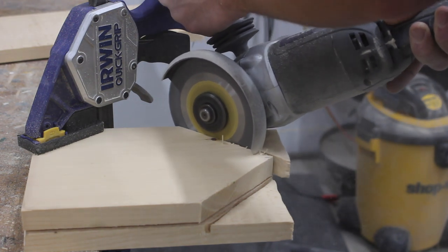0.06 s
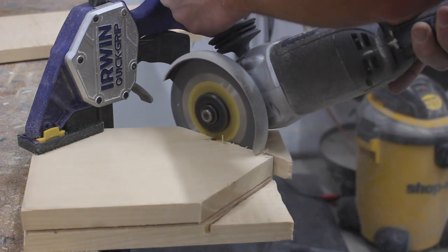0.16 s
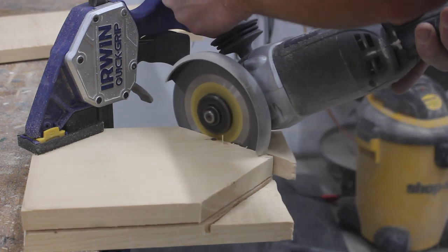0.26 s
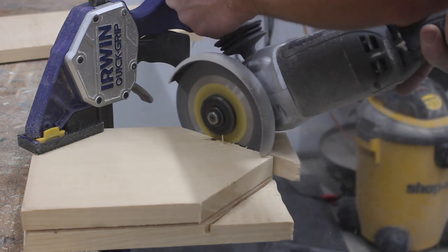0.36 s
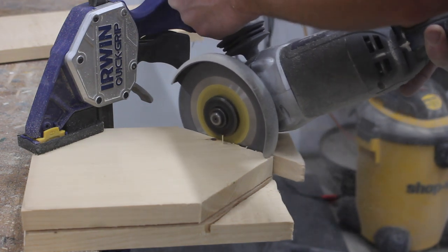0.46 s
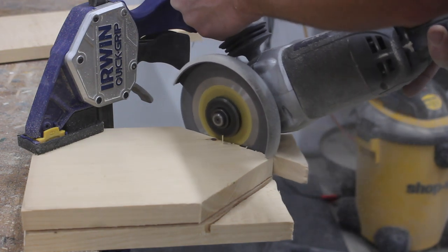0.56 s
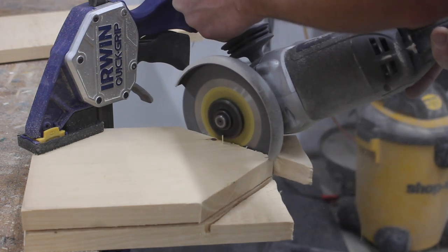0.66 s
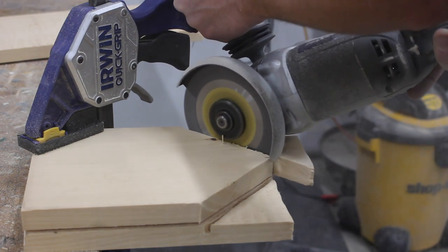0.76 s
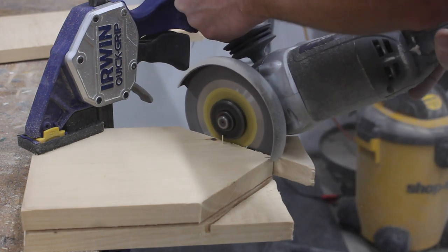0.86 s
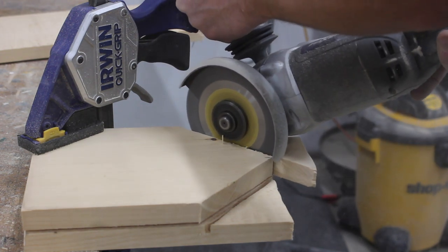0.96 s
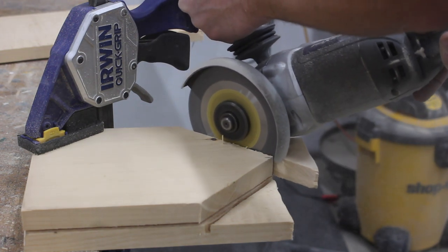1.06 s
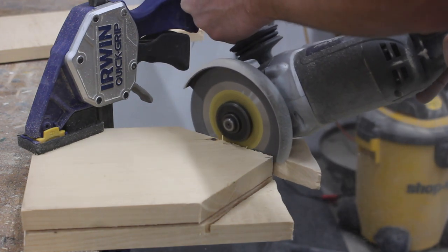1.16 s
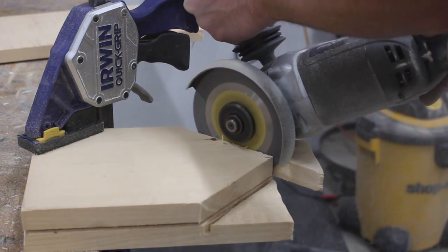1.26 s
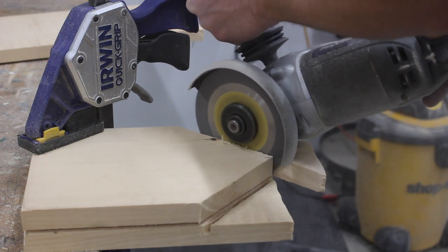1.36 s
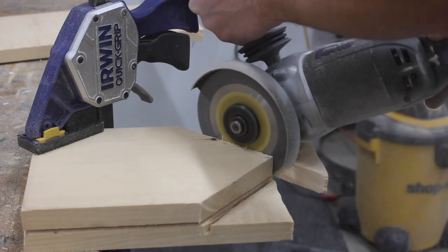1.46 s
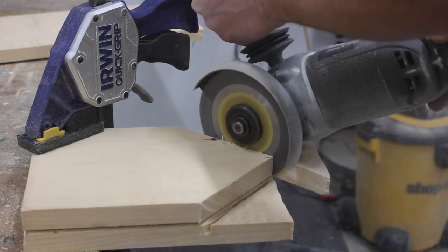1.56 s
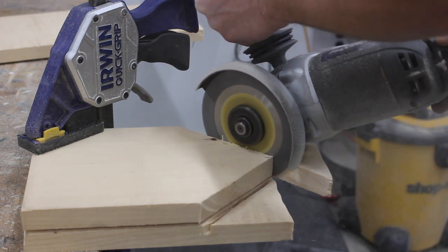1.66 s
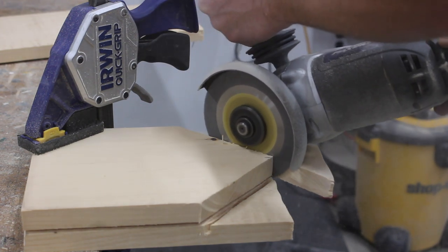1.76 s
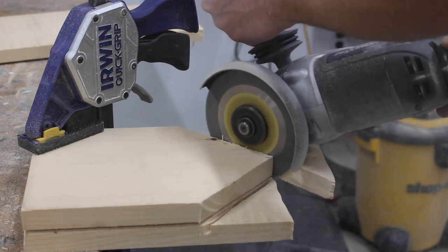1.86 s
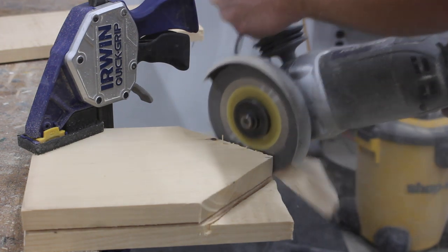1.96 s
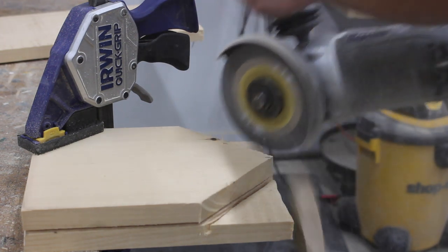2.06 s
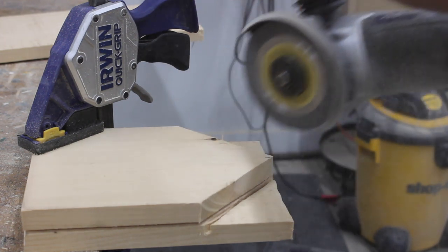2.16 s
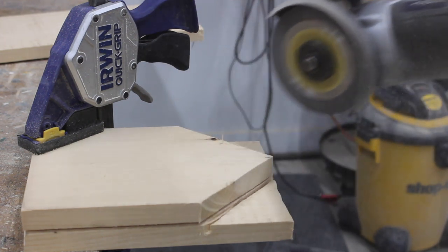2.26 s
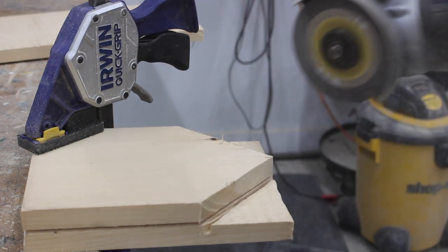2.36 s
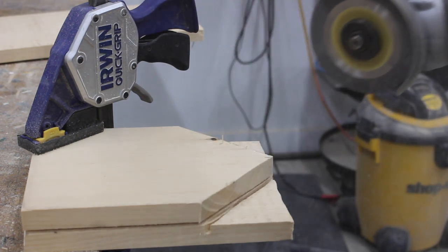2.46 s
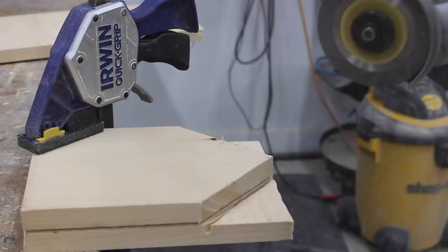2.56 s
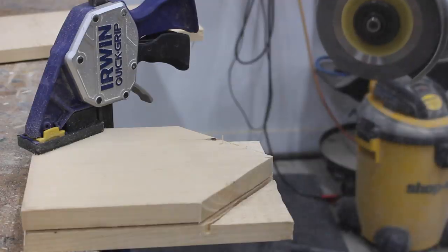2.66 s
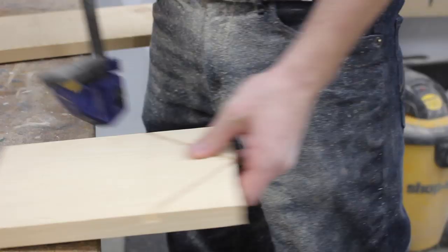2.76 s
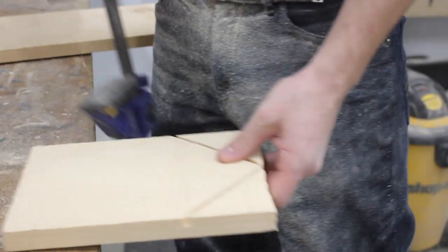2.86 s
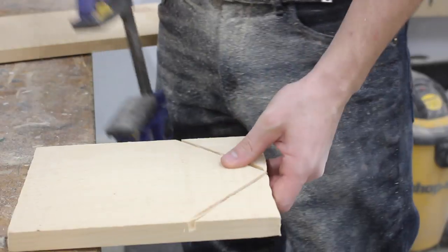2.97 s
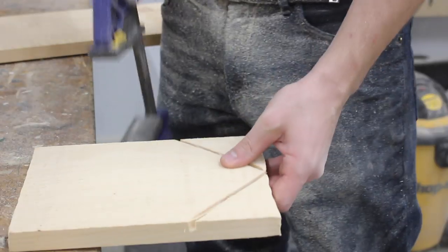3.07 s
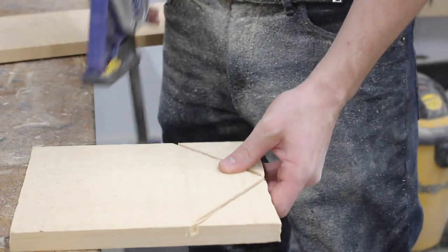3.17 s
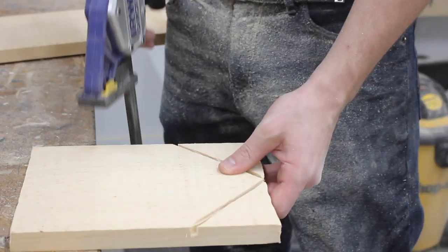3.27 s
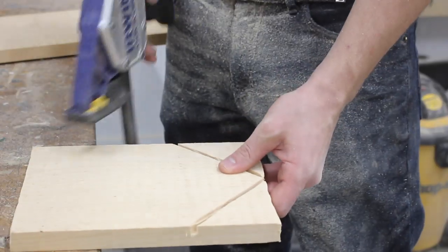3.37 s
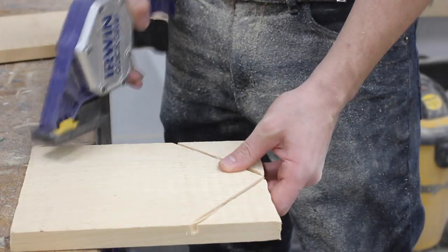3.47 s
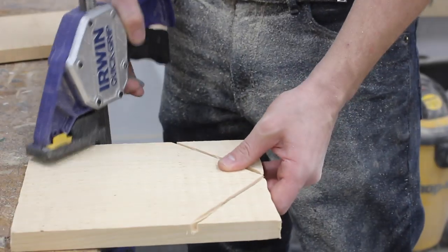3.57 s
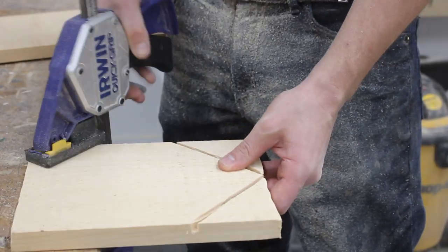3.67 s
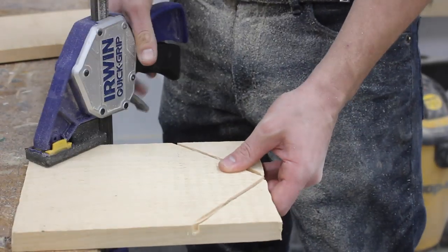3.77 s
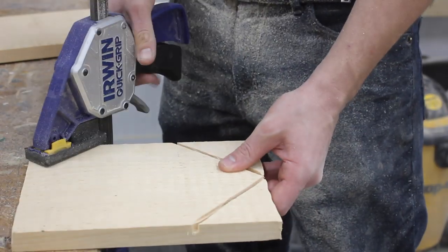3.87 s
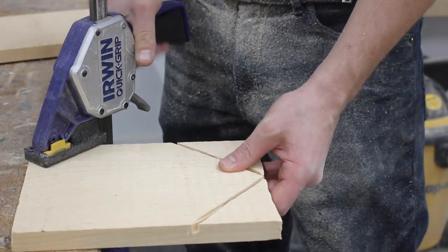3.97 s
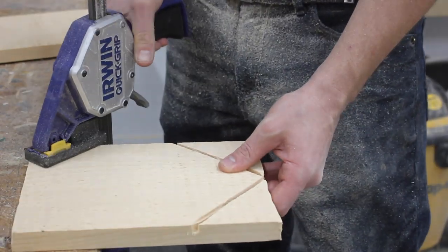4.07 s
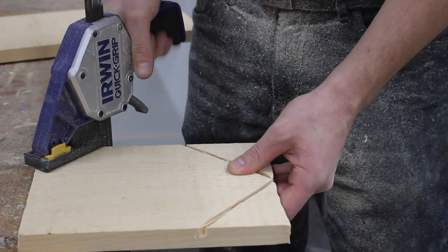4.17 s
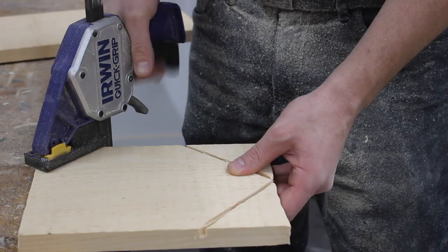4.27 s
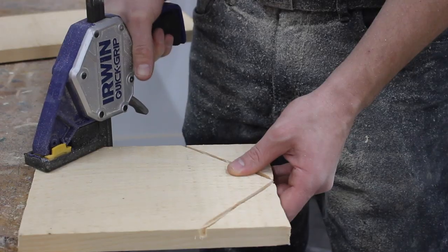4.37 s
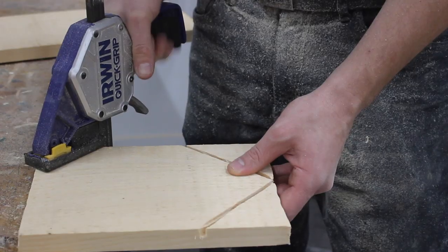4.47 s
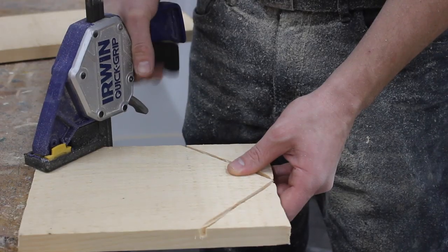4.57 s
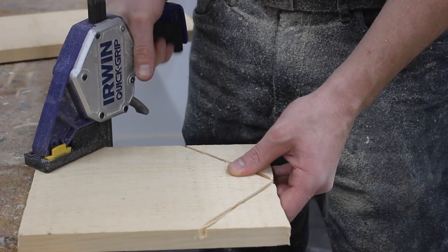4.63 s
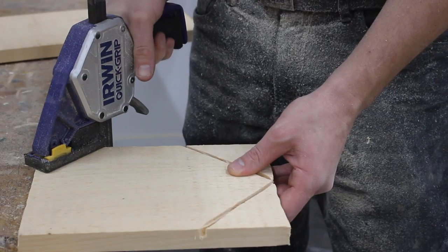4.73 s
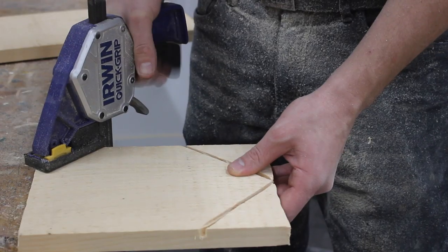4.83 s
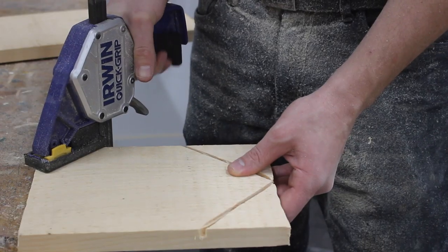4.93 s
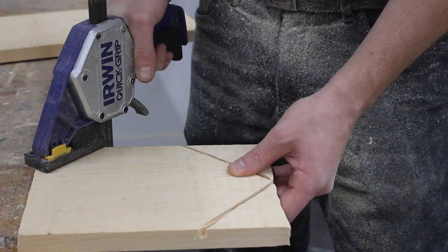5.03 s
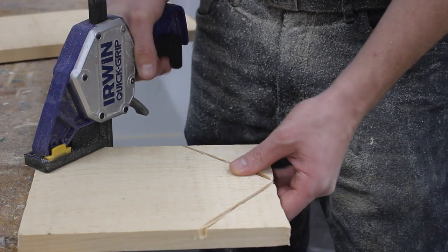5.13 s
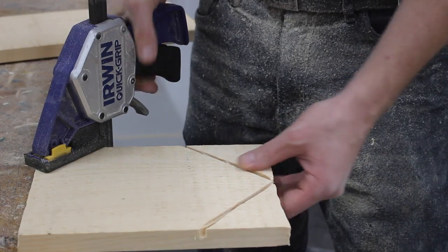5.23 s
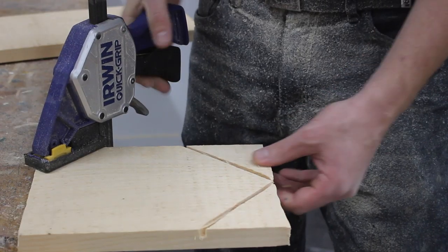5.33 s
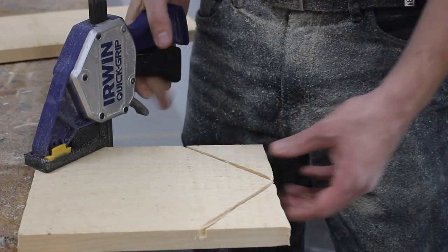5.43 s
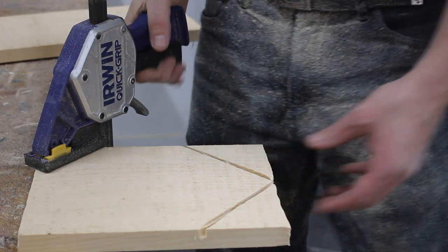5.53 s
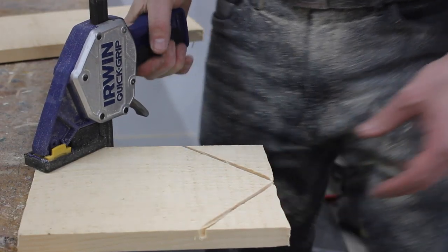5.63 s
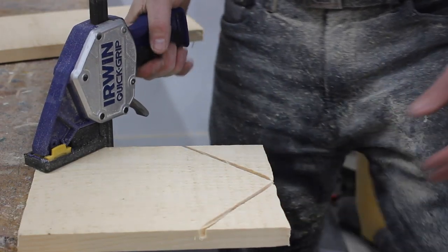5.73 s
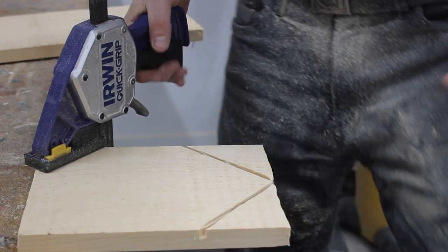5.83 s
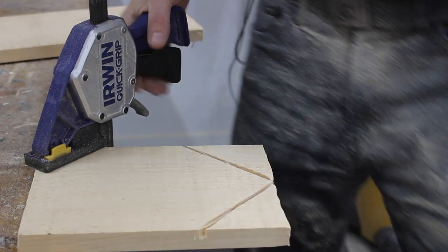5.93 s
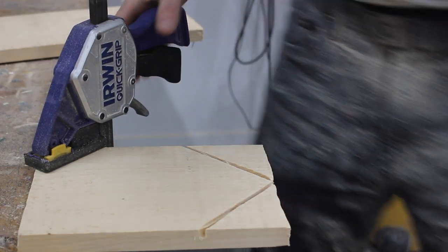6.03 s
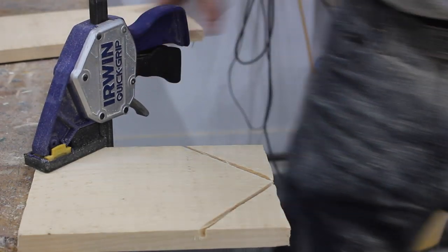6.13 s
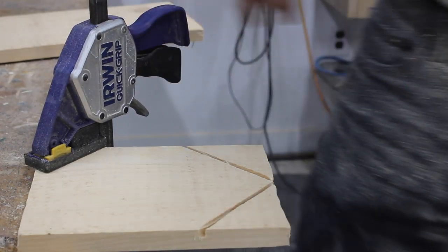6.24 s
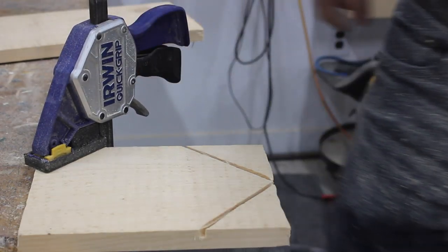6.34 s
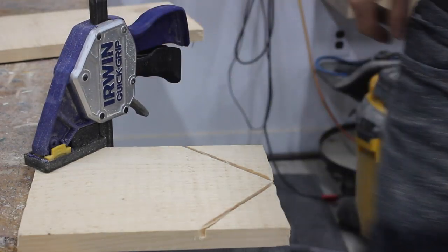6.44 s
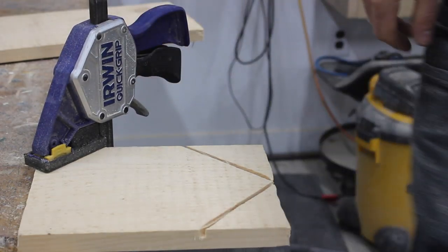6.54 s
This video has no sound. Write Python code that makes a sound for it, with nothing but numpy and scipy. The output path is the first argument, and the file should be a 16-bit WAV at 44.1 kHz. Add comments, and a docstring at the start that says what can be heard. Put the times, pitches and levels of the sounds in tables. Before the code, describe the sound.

From the start, an angle grinder cuts through a wooden board, loud, close and dry, with a high whine and a harsh rasp. Its pitch sags slightly as it bites deeper, with brief squeals. At about 2 seconds the blade comes free and coasts, falling in pitch with rushing air and rattling gears, then cuts off abruptly at 2.8 seconds. After a lull with light taps, a bar clamp lands on the board at 3.6 seconds with a sharp woody knock and a short judder. From 3.9 to 6 seconds it is pumped tight: uneven ratchet snaps, small scrapes and dull bench thumps, strongest around 4.4 and 4.7 seconds. The handle clacks against the metal bar at 5 and 5.6 seconds. Each hit rings briefly in a small workshop. Denim rustles over low shuffling, swelling after a last snap at 6 seconds, as a faint low hum sets in.

```python
"""An angle grinder whines and rasps through a board, comes free and starts to coast; its sound breaks off.
The whine is motor, gears and blade locked to the spindle speed; the rasp is the blade tearing wood fibres.
Then a one-handed bar clamp is set on the board and pumped tight: knocks, ratchet snaps and slides of the
bar thump the bench and ring in a small workshop. Clothes rustle, a faint hum sets in near the end, and a
limiter ducks after each loud blow."""
import sys
import numpy as np
from scipy import signal
from scipy.fft import rfft, irfft
from scipy.io import wavfile
from scipy.ndimage import uniform_filter1d, minimum_filter1d

SR = 44100
rng = np.random.default_rng(int(sys.argv[2]) if len(sys.argv) > 2 else 0)


def output_pcm(signal):
    """Save a mono or channel-first signal as 16-bit PCM at the path in sys.argv[1].

    Samples are clipped to [-1, 1] before scaling.
    """
    pcm = np.clip(np.atleast_2d(signal).T, -1, 1) * 32767
    wavfile.write(sys.argv[1], SR, np.round(pcm).astype(np.int16))


N = 291060
TIME = np.arange(N) / SR

IDLE_TURNS_PER_S, SAG_TURNS_PER_S = 173.6, 5.2   # spindle speed, and its drop under full load
# Grinder cues: the wood thins, the blade breaks through, power goes off, it comes free, the sound ends.
THINNING_S, THROUGH_S, SWITCH_OFF_S, FREE_S, END_S = 1.43, 1.95, 2.03, 2.11, 2.847

# The wood's drag on the blade. Each row: time in seconds, load from 0 to 1.
BLADE_LOAD = [(.28, 0), (.45, .27), (.62, .45), (.85, .96), (1.82, 1), (1.98, .5)]
# The whine of spindle, armature and gears under load.
# Each row: order (multiple of spindle speed), relative dB in a shallow cut, relative dB in a deep cut.
LOADED_TONES = [(1, -58, -57), (2, -53, -50), (2.75, -60, -53), (3, -54, -48), (6, -43.5, -42.5),
                (8, -52, -46), (9, -40, -43.5), (12, -40, -44), (13, -39, -44), (14, -45, -51),
                (15, -31.5, -43), (16, -32, -48), (18, -44, -46), (20, -45, -50), (21, -36, -46),
                (22, -39, -49), (24, -41, -43), (27, -48, -44), (28, -41, -47), (29, -48, -42),
                (30, -50, -45), (32, -46, -43), (33, -46, -44), (34, -45, -43), (36, -52, -47),
                (39, -52, -48), (51, -51, -54), (54, -60, -55), (57, -39.5, -50), (62, -54, -62),
                (63, -60, -56), (69, -62, -55), (81, -69, -62)]
# The whine of the unloaded motor and gears, creeping up until the sound ends.
# Each row: order, level in dB at switch-off.
FREE_TONES = [(2.75, -57.5), (3, -59), (9, -49), (18, -49), (21, -49), (27, -43), (28, -43), (30, -44),
              (49, -50), (60, -54)]
# Brief swells of single tones: blade squeals and surges of the high motor whistle.
# Each row: start and length in seconds, rough pitch in Hz, level in dB.
TONE_SWELLS = [(.37, .27, 2530, -38), (.78, .22, 3370, -39), (.87, .16, 4890, -31), (.72, .4, 5400, -39),
               (.8, .35, 9600, -44), (1.12, .75, 2530, -42), (1.45, .45, 3710, -41), (1.66, .19, 4890, -33),
               (1.69, .14, 5400, -38), (1.89, .21, 2530, -33), (1.94, .16, 1010, -37),
               (1.96, .14, 1520, -40), (1.81, .14, 9600, -41), (2.03, .08, 9600, -39),
               (1.84, .09, 3710, -36), (2.01, .1, 3540, -33), (2.01, .1, 3710, -34), (2.03, .06, 4210, -28),
               (2.04, .07, 4550, -31), (2.01, .08, 4720, -32)]
# The hand pushes the blade on. Each row: start and length in seconds, rasp boost and buzz boost in dB.
PUSHES = [(0.28, 0.36, 0, 2.5), (0.73, 0.28, 0.5, 0), (2.006, 0.11, 1, 1)]

# One-shot hits. Each row: time in seconds, relative level in dB.
BLADE_CATCHES = [(0.091, -16), (0.282, -15), (0.297, -15), (0.682, -15), (.713, -16), (0.738, -17),
                 (1.59, -18), (1.682, -19), (2.083, -16)]   # the blade catches in the kerf
GEAR_KNOCKS = [(2.1, -12), (2.13, -17), (2.1572, -18), (2.1837, -18), (2.2045, -14.5), (2.2855, -16),
               (2.3209, -20), (2.3343, -21), (2.3533, -19), (2.3844, -18), (2.4061, -14), (2.4235, -21),
               (2.442, -16), (2.4655, -20), (2.488, -15.5), (2.5762, -16.5), (2.6197, -17), (2.641, -21),
               (2.6855, -19), (2.703, -31), (2.7279, -16), (2.7696, -24), (2.7838, -21), (2.8316, -18)]   # the slack gears knock
CLAMP_KNOCKS = [(3.290, -28.5), (3.295, -35.5), (3.302, -25), (3.5712, -3), (3.5738, -9.5), (3.716, -20),
                (3.813, -20), (4.084, -16.5), (4.226, -30.5), (4.286, -40)]   # the clamp knocks against wood
HANDLE_CLACKS = [(3.433, -19.5), (4.226, -14), (4.2845, -8.5), (4.991, -1), (5.635, -1)]   # the loose handle hits the bar
BOARD_BUMPS = [(3.700, -16), (4.228, -27), (4.286, -22), (4.442, -14.5), (4.583, -17.5), (4.950, -19.5),
               (5.538, -24), (6.021, -16)]   # the board shifts with a dull bump
LOOSE_TICKS = [(3.090, -46.5), (3.876, -24), (4.030, -27), (4.057, -27), (4.237, -43), (4.293, -39),
               (4.351, -24), (4.584, -32), (4.907, -33), (5.538, -35.5), (5.903, -29.5), (6.441, -30)]   # small loose parts tick
# The layer mix of each kind of hit: offsets in dB for crack, snap, bar ring, bench thump and board thump.
KNOCK_MIX = (4, -1, -34, -13.5, -12)
CLACK_MIX = (-13, -15, 0, -24, -18.5)
BUMP_MIX = (-12, -29, -14, -3, -2)
TICK_MIX = (0, 2, -20, -33, -10)
# The ratchet bites on the bar. Each row: time in seconds, then relative levels in dB of snap, bar ring,
# catch plate, return spring, bench thump and board thump.
RATCHET_BITES = [(3.856, -16.5, -30, -36, -36, -42, -44), (3.866, -14.5, -33, -33, -32, -52, -44),
                 (4.042, -8, -10.5, -6.5, -16.5, -47, -40), (4.339, -16, -30, -37, -34, -36, -41),
                 (4.374, 0, -3.5, -14, -29, -19, -16), (4.6255, -4.5, -12.5, -18, -11.5, -11.5, -18),
                 (4.627, -19, -8, -16, -20, -25, -17), (4.6784, -2, 2, -11, -35, -10.5, -14.5),
                 (4.871, -22, -13.5, -30, -34, -38, -26), (5.285, -9, -6.5, -19, -13, -11.5, -8),
                 (6.009, -10.5, -10.5, -33, -22, -15, -30)]
# What rings after a hit. Each row: pitch in Hz, relative level in dB, seconds to die away by 60 dB.
BAR_MODES = [(814, -8, 0.012), (976, -8.5, 0.026), (1105, 1, 0.031), (1230, 1, 0.014), (1390, -12.5, 0.036),
             (1135, -32, 0.85), (1223, -30, 0.5), (1933, -14, 0.025), (3310, -2.5, 0.0041),
             (3670, -4, 0.0055), (5600, -13, 0.0044)]
BENCH_MODES = [(97, -27.5, 0.16), (133.4, -15.5, 0.22), (177.3, -13.5, 0.22), (200.5, -13, 0.14)]
BOARD_MODES = [(293, -17.5, 0.28), (344.4, -12, 0.13), (412, -31, 0.17)]

# Gestures. Each row: start in seconds, length in seconds, relative level in dB.
BRIGHT_SCRAPES = [(4.218, 0.028, -32.5), (4.283, 0.038, -28), (4.555, 0.045, -36.5), (4.583, 0.036, -29.5),
                  (4.905, 0.043, -31.5), (5.165, 0.028, -38.5), (5.256, 0.027, -37.5), (5.725, 0.04, -39)]   # short bright scrapes: the bar sliding, and one brief rustle
BOARD_SCUFFS = [(4.222, 0.016, -32), (4.925, 0.043, -41), (5.15, 0.073, -43), (5.537, 0.037, -36)]   # the board scuffs on the bench
JAW_JUDDERS = [(3.572, 0.032, -16), (3.6, 0.15, -28), (3.635, 0.03, -32), (3.73, .13, -37)]   # the jaw bounces as it lands, until it is held down
CLOTH_SWEEPS = [(4.19, 0.33, -32.5), (5.28, 0.22, -38), (5.64, 0.27, -35.5), (5.91, 0.26, -33),
                (6.13, 0.2, -30), (6.26, 0.099, -31), (6.28, 0.36, -44)]   # arms and legs move
# The fader ride of the shuffling at the bench. Each row: time in seconds, level in dB.
SHUFFLE_LEVEL = [(2.85, -74), (3.2, -64.5), (3.55, -54), (4.3, -47), (4.9, -42.5), (6.15, -44),
                 (6.35, -45.5), (6.6, -47.5)]

# Tone colours, drawn like EQ curves. Each row: frequency in Hz, relative level in dB.
RASP_EQ = [(120, -14), (220, -27), (330, -26), (470, -18), (600, -11.5), (1020, -6), (1300, -7.5),
           (2470, -4.5), (4860, 0), (6000, -5.5), (7300, -9.5), (8200, -22), (10500, -16.5), (16000, -41)]   # the blade tearing wood
SPLINTER_EQ = [(800, -14.5), (2500, -4.5), (6000, -1), (8500, -8.5), (12000, -10.5), (16000, -25)]   # snapping fibres
BUZZ_EQ = [(900, -20), (1900, 18), (2500, 24.5), (3100, -50.5), (4200, 4), (7000, -52)]   # the board buzzing under the blade
COAST_EQ = [(120, -46), (220, -22.5), (400, -16.5), (700, -5.5), (1000, -2), (1600, -4.5), (3000, 1.5),
            (3700, 1), (4350, 4.5), (5100, 4.5), (5700, -2.5), (6600, 0), (7400, -2.5), (8400, -16),
            (9500, -13), (10600, -7), (12500, -23), (16000, -32)]   # rush of fan and gears
RATTLE_EQ = [(600, -45), (1500, -52), (4500, 11), (5700, 6), (7200, 14.5), (8700, -4), (10800, 4.5),
             (13000, -15), (16000, -23)]   # knocking gears
CRACK_EQ = [(70, -29), (170, -15.5), (300, -2.5), (550, -3.5), (800, 4.5), (1300, 0), (1800, 3.5),
            (2400, 2), (3500, -4), (5500, -7), (8000, -65.5), (16000, -50)]   # woody crack
SNAP_EQ = [(300, -39.5), (900, -14), (2400, 0), (3300, 2.5), (4500, -2), (5600, -0.5), (6800, -9.5),
           (8500, -16), (11500, -21), (13000, -24), (16000, -53)]   # metal snap
PLATE_EQ = [(3000, -16), (4300, 4.5), (5000, 1), (5600, 5), (6300, -2), (7200, -26), (12000, -27)]   # the ratchet's catch plate
SPRING_EQ = [(6500, -37), (7400, 7), (8600, -3), (10300, -3), (11500, -36)]   # its return spring
SLIDE_EQ = [(100, 7), (330, 13), (550, 7), (1000, 8), (2000, -2), (4500, 4), (5900, 7.5), (7800, -1),
            (10500, -2.5), (13000, -12), (16000, -25)]   # the scraping bar
SLIP_EQ = [(3000, -23), (5800, 10), (7800, -6), (10500, 0), (13200, -9), (16000, -28)]   # its tiny slips
SCUFF_EQ = [(250, -6), (350, 3), (530, -7), (700, -5), (1100, -21), (4000, -55)]   # board rubbing on bench
DRUMMED_BOARD_EQ = [(50, -15), (130, -2), (180, 19.5), (240, 3), (310, -5), (550, 1.5), (800, 5),
                    (1100, 5.5), (1450, 9.5), (1780, 6.5), (2080, -7), (4000, -5), (6000, -8), (8500, -18),
                    (16000, -48)]   # the board under the bouncing jaw
SHUFFLE_EQ = [(25, 4), (60, -6), (88, 9.5), (105, -11), (127, 2), (160, -2.5), (205, 1.5), (260, 0.5),
              (340, 1), (520, -3.5), (1100, -8.5), (2500, -26.5)]   # low shuffling
CLOTH_EQ = [(290, -52), (500, -31), (855, 1.5), (988, 4.5), (1380, 2.5), (1840, 1.5), (5600, 3),
            (8500, -7.5), (11000, -8), (16000, -22)]   # rubbing denim
REVERB_EQ = [(60, 10), (180, -2.5), (350, 5), (600, -0.5), (900, -4.5), (1350, -5), (2400, -5.5),
             (3200, -8), (4100, -6), (5500, -5.5), (8000, -17), (16000, -2)]   # the workshop's reflections
ROOM_TONE_EQ = [(80, -12), (160, -1), (350, -3), (1200, 0), (4000, -11), (16000, -41)]   # the quiet background
# The workshop's decay. Each row: frequency in Hz, seconds to die away by 60 dB.
REVERB_T60 = [(100, 0.6), (400, 0.45), (1300, 0.97), (5000, 0.71), (9000, 0.53), (16000, 0.15)]


def grinder():
    """The spindle sags under load and coasts once switched off; whine, rasp and rattle end together."""
    load = automation(BLADE_LOAD)
    depth = np.maximum.accumulate(load) ** 1.6   # the cut only gets deeper
    speed = (IDLE_TURNS_PER_S - SAG_TURNS_PER_S * load) * np.exp(-since(SWITCH_OFF_S) / 3.73)
    angle = 2 * np.pi * np.cumsum(speed * (1 + 0.0005 * drift(23.8))) / SR
    rough = rasp(angle, depth) + gear_rattle()
    rough = low_cut(rough, hz=230, order=3)   # the rasp and rattle carry no deep bass
    return (whine(angle, load, depth) + rough) * (1 - ramp(END_S, 0.0056))


def whine(angle, load, depth, squeal_order=19, whistle_order=57):
    """Tones locked to the spindle: motor and gears sing, and the blade squeals until wood damps it."""
    through = ramp(THROUGH_S, 0.15)
    loaded = dying(2, THINNING_S, db_per_s=16.5) * (1 - ramp(FREE_S, 0.061))
    free = from_db(2 * since(SWITCH_OFF_S)) * through   # creeps up 2 dB a second
    squeal = from_db(-24.8 - 30 * load + 4.5 * arch(.09, .29)) * (1 - through)   # swells as it bites in
    whistle = dying(-39, 1.89, db_per_s=27) * through   # the motor, as the load lets go
    # Each tone: order, gain, slow waver in dB.
    tones = [(squeal_order, squeal, 1.3)]
    for start, length, hz, db in TONE_SWELLS:
        nearest_order = round(hz / (IDLE_TURNS_PER_S - SAG_TURNS_PER_S))
        tones.append((nearest_order, from_db(db) * arch(start, length) ** 2, 1.3))
    for order, shallow_db, deep_db in LOADED_TONES:
        tones.append((order, loaded * from_db(shallow_db + depth * (deep_db - shallow_db)), 1.7))
    tones.append((whistle_order, whistle, 2.2))
    tones += [(order, free * from_db(db), 1.7) for order, db in FREE_TONES]
    phase = rng.uniform(0, 2 * np.pi, size=100)   # tones of one order add in step
    shake_radians = .3 * drift(60)
    sound = 0
    for order, gain, waver_db in tones:
        wave = np.sin(order * angle + phase[int(order)] + shake_radians * (order < squeal_order))
        sound += gain * from_db(waver_db * drift(10.7)) * wave
    return np.sqrt(2) * sound


def rasp(angle, depth):
    """The blade tears fibres, hardest once a turn, softer when deep; once free, fan and gears rush."""
    rasp_db = -23 - 1.64 * depth + sum(db * arch(start, length) for start, length, db, _ in PUSHES)
    rasp_db += 0.8 * drift(30)   # hard and soft grain in the wood
    buzz_db = -35.5 + sum(db * arch(start, length) for start, length, _, db in PUSHES)
    tearing = (1 + 0.17 * np.sin(angle)) * from_db(0.2 * drift(243))
    fibres = noise(RASP_EQ) + from_db(-9.5) * splinters(per_s=1500)
    cutting = from_db(rasp_db) * fibres + from_db(buzz_db) * noise(BUZZ_EQ) + from_db(-41.5) * teeth(angle)
    coasting = dying(-26, FREE_S, db_per_s=0.5) * noise(COAST_EQ)
    free = ramp(FREE_S, 0.047)
    return np.sqrt(1 - free) * tearing * cutting + np.sqrt(free) * coasting


def teeth(angle, lowest_order=41, highest_order=90, tilt_db_per_octave=3):
    """The same uneven teeth strike on every turn: a comb of high overtones, a brightened rasp."""
    orders = np.arange(highest_order + 1)
    colour = from_db(at_hz(RASP_EQ, orders * IDLE_TURNS_PER_S) + tilt_db_per_octave * np.log2(orders + 1))
    strength = colour * (orders >= lowest_order) * rng.uniform(0, 1, len(orders))
    turn = irfft(strength * np.exp(2j * np.pi * rng.random(len(orders))), 4096)
    return rms_one(np.interp(angle / (2 * np.pi), np.arange(len(turn)) / len(turn), turn, period=1))


def splinters(per_s):
    """Fibres snap at random in a fine, bright crackle."""
    snaps = rng.choice([-1, 1], N) * random_triggers(per_s)
    return rms_one(tint(snaps, SPLINTER_EQ))


def gear_rattle():
    """The gears knock when the blade catches, and in an uneven run once they are slack."""
    knocks = from_db(-3) * clicks(*np.transpose(GEAR_KNOCKS)) + clicks(*np.transpose(BLADE_CATCHES))
    return fade(knocks, decay_s=0.0044) * noise(RATTLE_EQ)


def clamp_blows():
    """A woody crack and a metal snap with a gritty edge; each blow rings the bar, bench and board."""
    times, crack_db, snap_db, ring_db, bench_db, board_db = np.transpose(blow_cues())
    bites, _, _, plate_db, spring_db, _, _ = np.transpose(RATCHET_BITES)
    layers = [(clicks(times, crack_db), CRACK_EQ), (clicks(times, snap_db), SNAP_EQ),
              (clicks(bites, plate_db), PLATE_EQ), (clicks(bites, spring_db), SPRING_EQ)]
    attack = sum(tint(hits, eq) for hits, eq in layers)
    contact = from_db(14) * scatter(attack, longest_s=.0004, echo=0.23)
    grit = from_db(-11) * sum(fade(hits, decay_s=0.0056) * noise(eq) for hits, eq in layers)
    bench = strike(BENCH_MODES, times, bench_db, vary_db=3)
    board = strike(BOARD_MODES, times, board_db, vary_db=4)
    bar = strike(BAR_MODES, times, ring_db - 10, vary_db=.8)
    return contact + grit + bench + board + bar


def blow_cues():
    """The clamp's cue sheet. Each row: time in seconds, then crack, snap, ring, bench and board in dB."""
    kinds = [(CLAMP_KNOCKS, KNOCK_MIX), (HANDLE_CLACKS, CLACK_MIX),
             (BOARD_BUMPS, BUMP_MIX), (LOOSE_TICKS, TICK_MIX)]
    cues = [(start, *np.add(db, mix)) for hits, mix in kinds for start, db in hits]
    for start, snap, ring, _, _, bench, board in RATCHET_BITES:
        cues.append((start, snap - 5.5, snap, ring, bench, board))
    return sorted(cues)


def scrapes():
    """Bright, clicky scrapes (the bar's stick-slip in the jaw, one rustle); the board scuffs the bench."""
    slips = random_triggers(per_s=1200) * rng.uniform(-1, 1, N)
    scrape = noise(SLIDE_EQ) + from_db(-4.5) * rms_one(tint(slips, SLIP_EQ))
    rubbing = strokes(BRIGHT_SCRAPES) * scrape + strokes(BOARD_SCUFFS) * noise(SCUFF_EQ)
    return rubbing * from_db(2.5 * drift(140))


def jaw_judder():
    """Quick, uneven bounces of the jaw drum on the wooden board, in a few surges."""
    bounces = random_triggers(per_s=1100) * rng.uniform(.5, 1, N) * rng.choice([-1, 1], N)
    drumming = tint(rms_one(bounces) * strokes(JAW_JUDDERS), DRUMMED_BOARD_EQ)
    return scatter(drumming, longest_s=0.0025, echo=0.27)


def workshop(x, build_s=0.00063):
    """Diffuse reflections build up, then die band by band, the top treble first."""
    t, tail = TIME[:SR], 0
    edges = np.geomspace(50, 18000, 13)
    for low, high in zip(edges, edges[1:]):
        hz = np.sqrt(low * high)
        bandpass = signal.butter(2, [low, high], "band", fs=SR, output="sos")
        band = signal.sosfilt(bandpass, rng.standard_normal(SR))
        envelope = (1 - np.exp(-t / build_s)) * from_db(-60 * t / at_hz(REVERB_T60, hz))
        gain = from_db(at_hz(REVERB_EQ, hz)) * np.sqrt(2 * (high - low)) / SR
        tail += gain * rms_one(band * envelope)
    return signal.fftconvolve(x, tail)[:N]


def handling():
    """Lumpy shuffling at the bench; denim rubs along with it and swells as arms and legs sweep."""
    shuffle_gain = from_db(automation(SHUFFLE_LEVEL))
    cloth_gain = from_db(-4) * shuffle_gain + from_db(-5.5) * strokes(CLOTH_SWEEPS, power=3)
    shuffle = shuffle_gain * from_db(3.5 * drift(9.4)) * noise(SHUFFLE_EQ)
    cloth = cloth_gain * from_db(1.44 * drift(47)) * noise(CLOTH_EQ)
    return shuffle + cloth


def after_rush():
    """A soft rush, low body and hiss, fades out where the grinder breaks off."""
    envelope = ramp(END_S, 0.016) * dying(0, END_S, db_per_s=76)
    return envelope * (from_db(-43.5) * noise(SHUFFLE_EQ[3:]) + from_db(-45) * noise(CLOTH_EQ))


def hum(start_s=6.1, hz=124):
    """A faint, steady low tone sets in near the end."""
    return from_db(-51.5) * ramp(start_s, .15) * np.sqrt(2) * np.sin(2 * np.pi * hz * TIME)


def strike(modes, times, db, vary_db):
    """Every blow rings every mode, with a strength that varies at random from hit to hit."""
    out = np.zeros(N)
    for k, (hz, level_db, t60) in enumerate(modes):
        r, w = from_db(-60 / (t60 * SR)), 2 * np.pi * hz / SR
        force = clicks(times, db + level_db + vary_db * rng.standard_normal(len(times)))
        out += (-1) ** k * signal.lfilter([0, np.sin(w)], [1, -2 * r * np.cos(w), r * r], force + 1e-18)
    return out


def scatter(x, longest_s, echo):
    """Waves bounce to and fro inside the clamp: allpass loops smear a click over a few milliseconds."""
    for lag in longest_s * SR * np.geomspace(.13, 1, 5):
        loop = np.r_[1, np.zeros(int(lag)), echo]
        x = signal.lfilter(loop[::-1], loop, x)
    return x


def tint(impulses, eq, size=4096):
    """Give impulses a colour; the response is minimum phase, so nothing sounds early."""
    gain = from_db(at_hz(eq, np.arange(size // 2 + 1) * SR / size))
    cepstrum = irfft(np.log(gain))
    causal = (np.arange(size) > 0) & (np.arange(size) < size // 2)
    response = irfft(np.exp(rfft(2 * cepstrum * causal)))
    return signal.fftconvolve(impulses, response / np.linalg.norm(response))[:N]


def noise(eq):
    """Steady coloured noise at unit power, falling steeply below the curve's lowest point."""
    hz = np.arange(N // 2 + 1) * SR / N
    gain = from_db(at_hz(eq, hz)) * np.minimum(hz / eq[0][0], 1) ** 2
    return rms_one(irfft(rfft(rng.standard_normal(N)) * gain, N))


def drift(rate_hz):
    """A smooth random wobble with spread 1, drawn every 40 samples."""
    r = np.exp(-80 * np.pi * rate_hz / SR)
    slow = signal.lfilter([1], [1, -2 * r, r * r], rng.standard_normal(N // 40 + 2002))[2000:]
    return np.interp(np.arange(N) / 40, np.arange(len(slow)), rms_one(slow))


def random_triggers(per_s):
    """Unit impulses at random moments."""
    return rng.random(N) < per_s / SR


def clicks(times, db):
    """One impulse for each hit."""
    out = np.zeros(N)
    out[np.round(times * SR).astype(int)] = from_db(db)
    return out


def fade(impulses, decay_s):
    """Each impulse starts an exponential decay."""
    return signal.lfilter([1], [1, -np.exp(-1 / (decay_s * SR))], impulses + 1e-18)


def strokes(gestures, power=1):
    """The summed gain of gestures; a higher power softens their edges."""
    return sum(from_db(db) * arch(start, length) ** power for start, length, db in gestures)


def arch(start_s, length_s):
    """A rounded stroke of height 1."""
    return np.sqrt(np.clip(1 - (2 * (TIME - start_s) / length_s - 1) ** 2, 0, 1))


def ramp(at_s, over_s):
    """A straight rise from 0 to 1, centred on a moment."""
    return np.clip((TIME - at_s) / over_s + .5, 0, 1)


def dying(db, start_s, db_per_s):
    """A gain that holds its level, then fades from a moment on."""
    return from_db(db - db_per_s * since(start_s))


def since(start_s):
    """Seconds gone by since a moment, zero before it."""
    return np.maximum(TIME - start_s, 0)


def automation(points):
    """A breakpoint curve read at every sample."""
    return np.interp(TIME, *np.transpose(points))


def at_hz(points, hz):
    """Read a curve on a log-frequency axis."""
    f, value = np.transpose(points)
    return np.interp(np.log(hz + 1), np.log(f), value)


def from_db(db):
    """Decibels to gain."""
    return 10 ** (np.asarray(db) / 20)


def rms_one(x):
    """Scale to unit power."""
    return x / np.sqrt(np.mean(x ** 2) + 1e-20)


def low_cut(x, hz, order):
    """Roll off the bass."""
    return signal.sosfilt(signal.butter(order, hz, "high", fs=SR, output="sos"), x)


def hold_peaks(x, ceiling_db, window_s):
    """A fast limiter holds the crests of a sustained loud sound under a ceiling."""
    size = int(window_s * SR) | 1
    gain = np.minimum(from_db(ceiling_db) / (np.abs(x) + 1e-9), 1)
    return x * uniform_filter1d(minimum_filter1d(gain, size=size), size=size)


def limiter(x, threshold_db, release_db_per_s, attack_s):
    """The gain drops just after a loud peak and creeps back, so that the room swells behind each blow."""
    power = uniform_filter1d(x ** 2, size=64)
    over_db = np.maximum(10 * np.log10(np.maximum(power, 1e-12)) - threshold_db, 0)
    held_db = np.maximum.accumulate(over_db + release_db_per_s * TIME) - release_db_per_s * TIME
    return x * from_db(-fade(held_db, attack_s) / (attack_s * SR))


def scene():
    """The mono mix: a dry grinder, then the clamp with its reverb, over quiet room tone."""
    clamp = clamp_blows() + scrapes() + jaw_judder()
    reverb = from_db(-0.5) * workshop(clamp)
    room_tone = from_db(-62.5) * noise(ROOM_TONE_EQ)
    cutting = hold_peaks(grinder(), ceiling_db=-8, window_s=0.0055)
    return (cutting + after_rush() + clamp + reverb + handling() + hum() + room_tone)[None]


def record(dry):
    """The master chain: limiter, rounded peaks, thinned bass and a steep high cut."""
    limited = limiter(dry[0], threshold_db=-12.5, release_db_per_s=97, attack_s=0.0056)
    ceiling = from_db(-6)
    rounded = ceiling * np.tanh(limited / ceiling)
    high_cut = signal.ellip(10, .1, 80, 15900, fs=SR, output="sos")
    return signal.sosfilt(high_cut, low_cut(rounded, hz=45, order=2))[None]


dry = scene()
out = record(dry)
output_pcm(out)
```